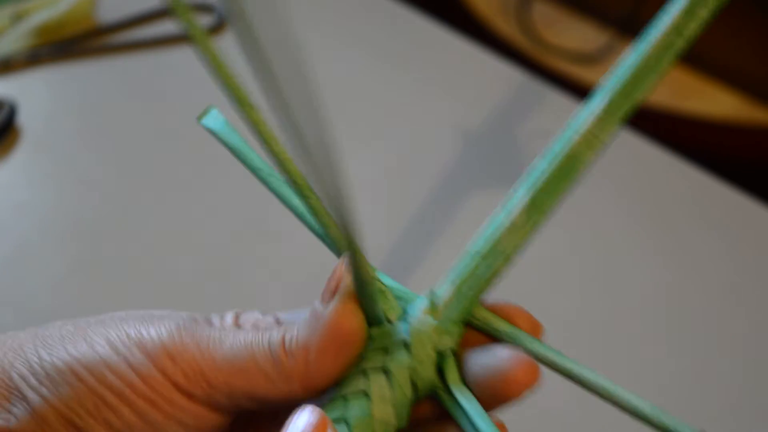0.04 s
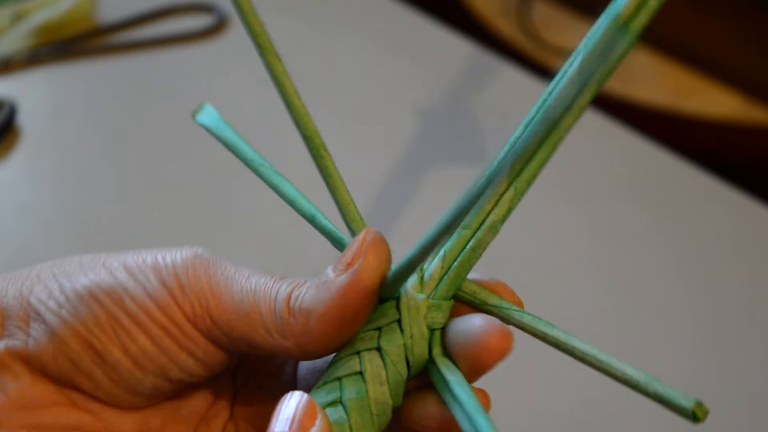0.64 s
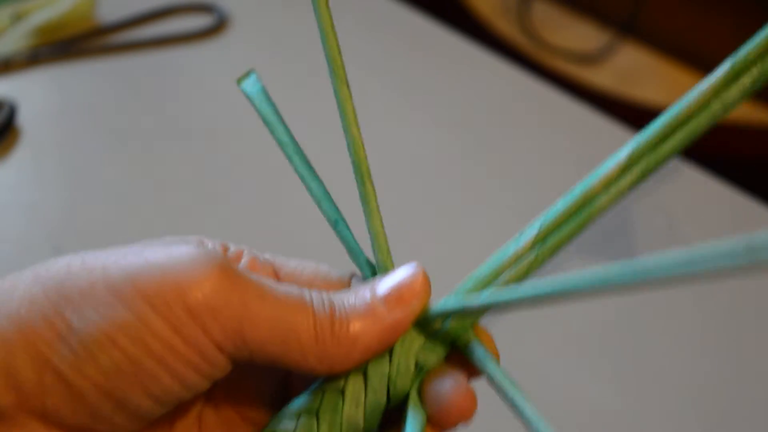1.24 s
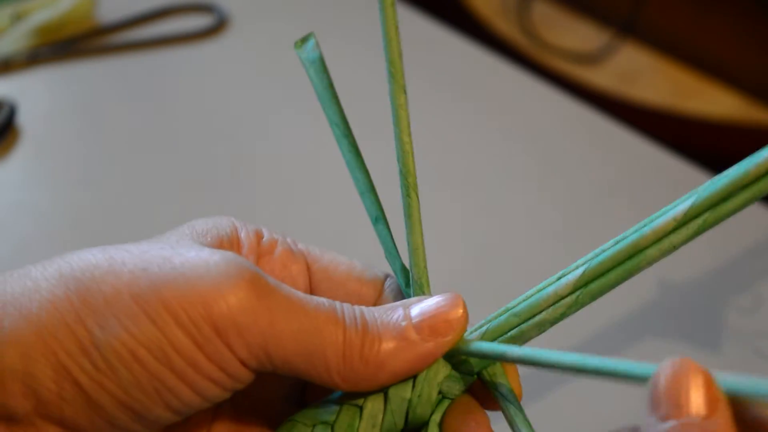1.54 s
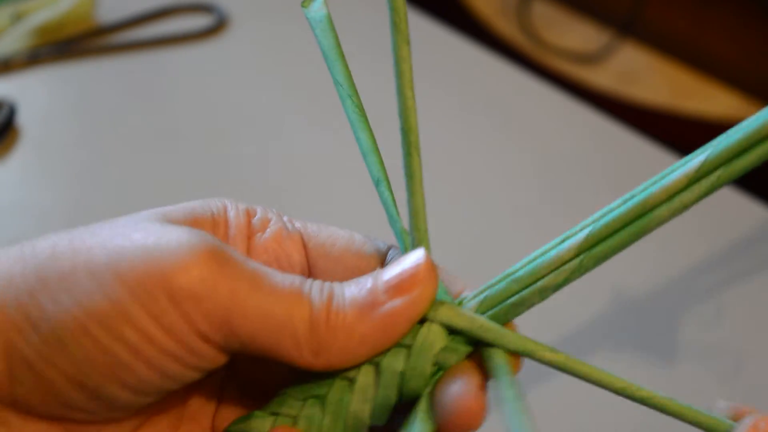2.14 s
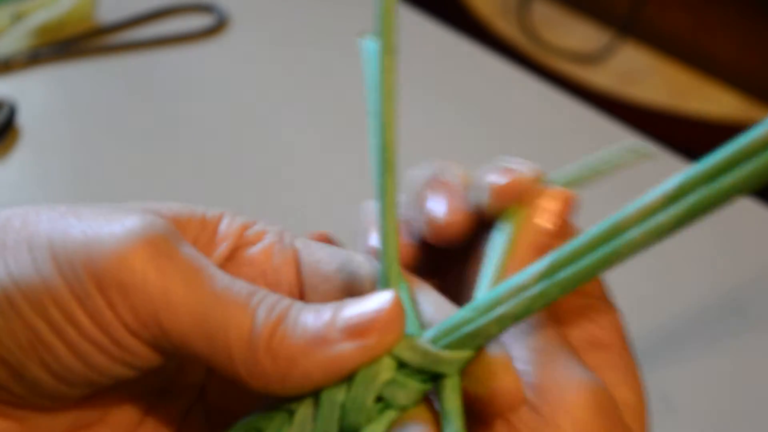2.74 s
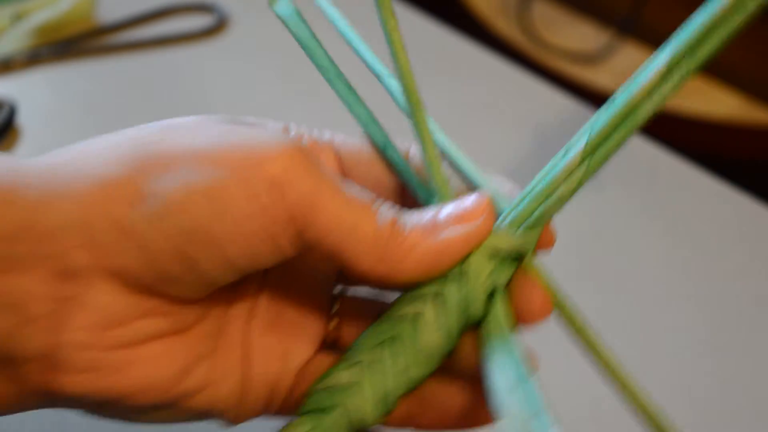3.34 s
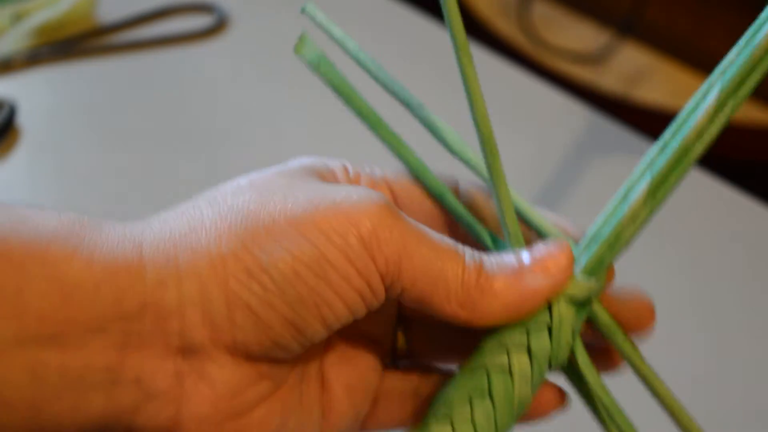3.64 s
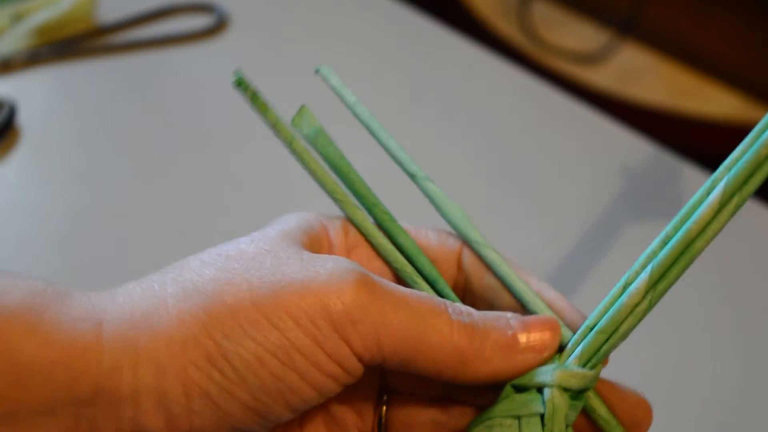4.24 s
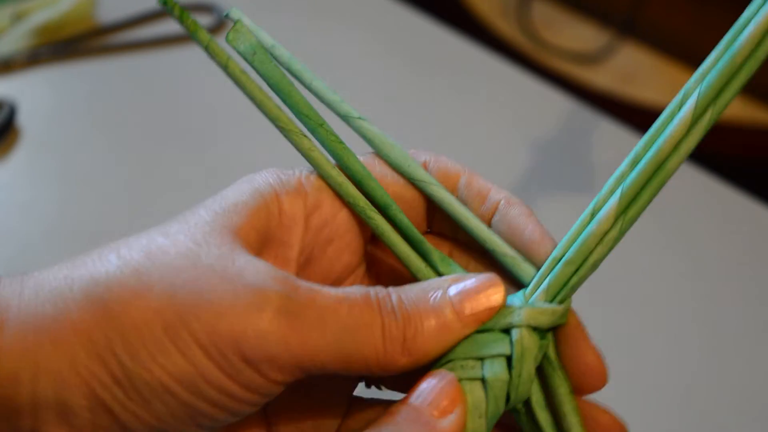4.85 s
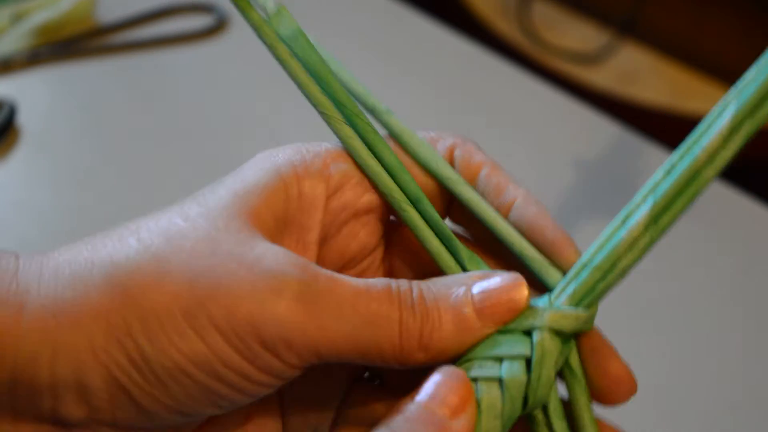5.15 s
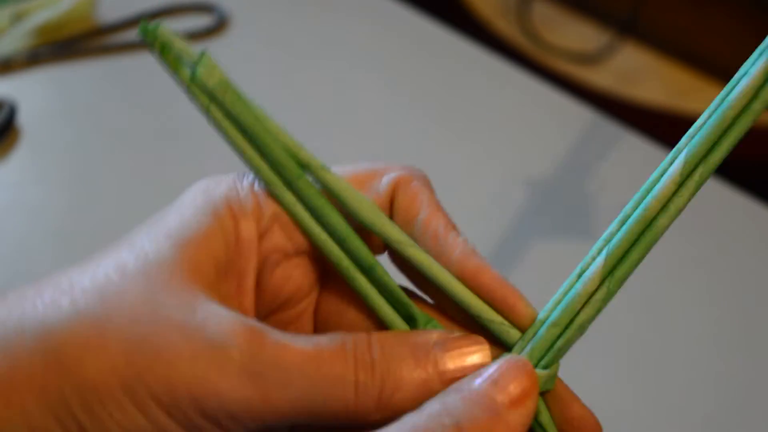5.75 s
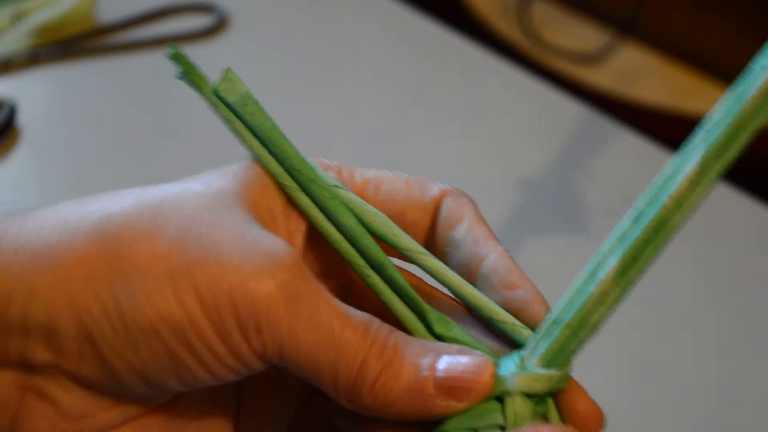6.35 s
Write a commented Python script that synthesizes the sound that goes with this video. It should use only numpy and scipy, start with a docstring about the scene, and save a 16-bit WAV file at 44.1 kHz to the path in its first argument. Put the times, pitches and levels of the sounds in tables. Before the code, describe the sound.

Soft, papery swishes and small sharp snaps come from paper tubes being braided by hand, over a faint room hiss.

```python
"""Braiding paper tubes

Hands braid rolled paper tubes above a table in a quiet room, close to a mono microphone.
The tubes hiss as they slide in tiny slips, squeak where they bind, snap where they crease, knock once.
Fingertips rub, the palm shuffles, loose ends rustle. Behind: a faint clock, a fan, mains hum and hiss."""
import sys
import numpy as np
from scipy import signal
from scipy.fft import rfft, irfft
from scipy.io import wavfile
from scipy.ndimage import uniform_filter1d

SR = 44100
rng = np.random.default_rng(int(sys.argv[2]) if len(sys.argv) > 2 else 0)


def master(y):
    """Save y as 16-bit WAV."""
    cut = np.clip(np.atleast_2d(y).T, -1, 1)
    pcm = np.round(cut * 32767)  # scale
    wavfile.write(sys.argv[1], SR, pcm.astype(np.int16))


N = 282240

# paper-on-paper friction spectrum: freq_hz, gain_db
PAPER_SPECTRUM = [(300, -14.5), (1500, -20.5), (2800, -12), (4500, -3.5), (6300, 0), (7400, -1), (9600, 4),
                  (11300, -3), (12200, -4.5), (14000, -18), (16000, -18)]
# spectrum of a cracking crease: freq_hz, gain_db
CREASE_SPECTRUM = [(300, -23), (1400, -5), (2300, -3.5), (3300, 4), (4400, -4.5), (5400, -1), (6900, -0.5),
                   (8500, 6), (11200, 2.5), (12400, -9), (16000, -8)]


def amp(db):
    """dB to amplitude."""
    return 10 ** (np.asarray(db) / 20)


def unit_rms(x):
    """Scales to rms 1."""
    return x / np.sqrt(np.mean(x ** 2) + 1e-20)


def curve(points, hz):
    """Interpolates a table on a log-frequency axis."""
    freq_hz, value = np.transpose(points)
    return np.interp(np.log(hz + 1), np.log(freq_hz + 1), value)


def add(mix, start_s, sound):
    """Adds a sound to the mix in place."""
    part = mix[max(round(start_s * SR), 0):][:len(sound)]
    part += sound[:len(part)]


def colour(x, gain):
    """Filters x by gain(hz), then scales to rms 1."""
    return unit_rms(irfft(rfft(x) * gain(np.fft.rfftfreq(len(x), 1 / SR)), len(x)))


def noise(gain):
    """Gaussian noise shaped by gain(hz), rms 1."""
    return colour(rng.standard_normal(N), gain)


def peak(hz, centre_hz, half_width_hz):
    """Gain of a resonance with steep skirts."""
    return 1 / (1 + ((hz - centre_hz) / half_width_hz) ** 2)


def comb(hz, spacing_hz):
    """Evenly spaced resonances of a pinched tube: +1 on them, -1 between."""
    return np.cos(2 * np.pi * hz / spacing_hz)


def click(gain_db, size=1024):
    """Minimum-phase click with spectrum gain_db(hz)."""
    log_gain = np.log(amp(gain_db(abs(np.fft.fftfreq(size, 1 / SR)))))
    return np.fft.ifft(np.exp(np.conj(signal.hilbert(log_gain)))).real


def slips(per_s, spread_db):
    """Fibres catch and let go: random tiny impulses, a few of them larger, rms 1."""
    size = amp(spread_db * np.minimum(rng.exponential(1, N), 4))
    sign = rng.choice([-1., 1.], N)
    return unit_rms(size * sign * (rng.random(N) < per_s / SR))


def swells(rows):
    """Envelope with one Gaussian bump per row: centre_s, length_s, level_db."""
    t = np.arange(N) / SR
    return sum(amp(db) * np.exp(-2 * ((t - centre_s) / length_s) ** 2) for centre_s, length_s, db in rows)


def air(level_db=-55.58):
    """Steady room air and microphone hiss."""
    # noise floor: freq_hz, gain_db
    spectrum = [(12, -38), (20, -7.5), (140, -2), (614, -5.5), (686, -4.5), (746, -5.5), (857, -3),
                (1410, -8), (1720, -8), (7310, -17), (15500, -20)]
    return amp(level_db) * noise(lambda hz: amp(curve(spectrum, hz)))


def fan():
    """Noise rings the narrow resonances of a fan housing."""
    # housing modes: centre_hz, half_width_hz, rms_db
    modes = [(812, 15, -76.5), (846.4, 28, -70), (990, 42, -71.5)]
    return sum(amp(db) * noise(lambda hz: peak(hz, centre_hz, half_width_hz))
               for centre_hz, half_width_hz, db in modes)


def mains_hum():
    """The mains tone and its octave."""
    # hum partials: freq_hz, rms_db
    partials = [(60, -74.5), (120, -74.5)]
    t = np.arange(N) / SR
    return sum(amp(db) * np.sqrt(2) * np.sin(2 * np.pi * (hz * t + rng.random())) for hz, db in partials)


def clock(level_db=-58, rise_s=0.0048, t60_s=0.2):
    """A double tick each second, smeared by reverberation on its way across the room."""
    # escapement beats within each second: offset_s, gain_db
    beats = [(0.041, 6.5), (0.073, 7)]
    # case modes: centre_hz, half_width_hz, gain_db
    modes = [(1730, 530, 1), (2500, 410, 3), (3750, 220, -3), (5200, 760, 0)]
    t = np.arange(N) / SR
    case = noise(lambda hz: sum(amp(db) * peak(hz, centre_hz, half_width_hz)
                                for centre_hz, half_width_hz, db in modes))
    power = np.zeros(N)
    for offset_s, db in beats:
        age_s = (t - offset_s) % 1
        power += (amp(db - 60 * age_s / t60_s) * (1 - np.exp(-age_s / rise_s))) ** 2
    return amp(level_db) * case * np.sqrt(power)


def rustle(flutter_db=4.0, ticks_per_s=45, ticks_db=-8):
    """Loose ends never quite rest: an uneven whisper with tiny creases ticking in it."""
    # rustle envelope: time_s, gain_db
    contour = [(0, -76.5), (.85, -67), (1.25, -70.5), (2.2, -72), (2.9, -60.5), (3.65, -72), (4.6, -69),
               (4.85, -67.5), (5.35, -60), (5.6, -69), (5.88, -63), (6.4, -72.5)]
    flutter = noise(lambda hz: peak(hz, 0, half_width_hz=20))
    whisper = colour(slips(per_s=7100, spread_db=3.0), lambda hz: amp(curve(PAPER_SPECTRUM, hz)))
    tick = click(lambda hz: curve(CREASE_SPECTRUM, hz))
    ticks = unit_rms(signal.oaconvolve(slips(ticks_per_s, spread_db=2.0), tick)[:N])
    gain_db = np.interp(np.arange(N) / SR, *np.transpose(contour))
    return amp(gain_db) * (whisper * amp(flutter_db * flutter) + amp(ticks_db) * ticks)


def palm_shuffles(centre_hz=225, half_width_hz=70):
    """The soft palm pushes the whole braid: a low, muffled shuffle."""
    # grip shifts: centre_s, length_s, level_db
    shifts = [(2.6, 0.6, -72), (3.27, 0.35, -67), (4.45, 0.45, -74)]
    shuffle = colour(slips(per_s=400, spread_db=0), lambda hz: peak(hz, centre_hz, half_width_hz))
    return swells(shifts) * shuffle


def finger_rubs():
    """A fingertip drags along a tube and sounds its body: dull slips that swell and die."""
    # fingertip drags: centre_s, length_s, level_db
    drags = [(1.483, 0.12, -62), (1.782, 0.032, -59), (2.165, 0.047, -53), (2.52, 0.42, -63),
             (2.93, 0.05, -59), (3.077, 0.11, -62), (3.903, 0.029, -57.5)]
    # skin-on-paper friction spectrum: freq_hz, gain_db
    skin = [(300, -22), (900, 5.5), (1300, 1), (2000, 0), (2600, -20), (3600, -3.5), (5500, -13),
            (12000, -23)]
    return swells(drags) * colour(slips(per_s=5000, spread_db=0.9), lambda hz: amp(curve(skin, hz)))


def tube_knock(rise_s=0.00029):
    """One tube strikes another and rings its damped modes."""
    # blows: start_s, peak_db
    blows = [(2.5429, -30)]
    # hollow tube modes: freq_hz, gain_db, t60_s
    modes = [(905, -20, 0.015), (1110, 1, 0.015), (1950, -15, 0.007), (3380, 5.5, 0.0051),
             (3700, 0, 0.0048), (4250, -14, .006)]
    out, t = np.zeros(N), np.arange(2048) / SR
    ring = sum(amp(db - 60 * t / t60_s) * np.sin(2 * np.pi * hz * t) for hz, db, t60_s in modes)
    ring *= 1 - np.exp(-t / rise_s)
    for start_s, peak_db in blows:
        add(out, start_s, amp(peak_db) * ring / abs(ring).max())
    return out


def tube_squeaks(half_width_hz=300, octave_db=-3):
    """Stick-slip drives the first two resonances of a pinched tube into a short, hoarse note."""
    # tubes binding in the braid: centre_s, length_s, level_db, pitch_hz
    binds = [(1.48, 0.037, -57, 3600), (2.928, 0.02, -50, 4680), (3.912, 0.034, -53.5, 3100)]
    out = np.zeros(N)
    friction = slips(per_s=4900, spread_db=3.5)
    for centre_s, length_s, level_db, pitch_hz in binds:
        note = colour(friction, lambda hz: peak(hz, pitch_hz, half_width_hz)
                      + amp(octave_db) * peak(hz, 2 * pitch_hz, half_width_hz))
        out += swells([(centre_s, length_s, level_db)]) * note
    return out


def crease_snaps(ring_db=3, max_fall_db=16, crumble_db=-16, crumble_s=0.00088, strain_s=0.00055):
    """The paper wall strains, buckles in one crack and crumbles for a millisecond more."""
    # buckles: time_s, rms_2ms_db, centre_hz, fall_db (one octave off centre), resonance_spacing_hz
    buckles = [(0.8799, -40, 10200, 5, 4220), (1.461, -32.5, 10300, 26, 3600),
               (1.4662, -35.5, 8600, 6, 3700), (1.473, -38, 10600, 5, 3600), (1.5149, -33, 10200, 2, 3300),
               (1.5185, -31.5, 10600, 4, 3300), (1.5292, -36.5, 7000, -5, 3400),
               (1.5315, -22, 8700, 13, 5000), (1.7016, -26.5, 6600, 4, 4160),
               (3.0007, -38, 12900, 29, 4200), (3.2147, -37, 5900, 13, 3950), (3.6122, -43, 9800, 28, 3300),
               (4.6844, -43.5, 5060, 31, 2860), (4.7346, -46, 9500, 2, 2710),
               (4.7616, -35.5, 3220, 1.5, 4380), (5.163, -46.5, 3000, 5, 2170),
               (6.3445, -43, 5160, 20, 2530)]
    out, lead_samples = np.zeros(N), 128
    t = (np.arange(512) - lead_samples) / SR
    crumble = amp(crumble_db) * np.exp(-np.maximum(t / crumble_s, -t / strain_s))
    for time_s, level_db, centre_hz, fall_db, spacing_hz in buckles:
        force = crumble * rng.choice([-1., 1.], len(t))
        force[lead_samples] = 1  # the wall gives way
        body = click(lambda hz: curve(CREASE_SPECTRUM, hz) + ring_db * comb(hz, spacing_hz)
                     - np.clip(fall_db * np.log2((hz + 1) / centre_hz) ** 2, 0, max_fall_db))
        crack = np.convolve(force, body)
        rms_2ms = np.sqrt(np.sum(crack ** 2) / (0.002 * SR))
        add(out, time_s - lead_samples / SR, amp(level_db) * crack / rms_2ms)
    return out


def stroke_envelope(t, length_s, rise_share=0.51, fall_share=0.46,
                    brush_db=-12.5, lead_s=0.057, trail_s=0.026):
    """A stroke gathers speed, holds and stops; the tubes brush lightly before and after."""
    rise = t / (rise_share * length_s)
    fall = (length_s - t) / (fall_share * length_s)
    ramp = np.clip(np.minimum(rise, fall) + 0.5, 0, 1)
    brush = np.exp(np.minimum(t, 0) / lead_s - np.maximum(t - length_s, 0) / trail_s)
    return np.hypot(np.sin(np.pi / 2 * ramp) ** 2, amp(brush_db) * brush)


def tube_slides(trim_db=-1.6, judder_db=1.77, ring_db=2.8, pivot_hz=7500,
                mid_spacing_hz=2960, grip_octaves=0.36):
    """Tube slides over tube: a stream of slips coloured by the paper and the tube's resonances."""
    # sliding strokes: start_s, length_s, gain_db, tilt_db_per_octave
    strokes = [(0, 0.021, -41, -2.5), (0.022, 0.088, -62, 0), (.887, 0.025, -52.5, 6),
               (0.978, 0.13, -47.5, 2), (1.424, 0.17, -53, -3), (1.506, 0.011, -45, 3),
               (1.705, 0.073, -53.5, -3), (1.776, 0.019, -45, -2.5), (2.06, .04, -58.5, -6),
               (2.123, 0.064, -57, -7), (2.592, 0.029, -53, -4), (2.84, .05, -51, -3.5),
               (2.92, 0.014, -51, -8), (2.994, 0.071, -49, -8.5), (3.097, 0.044, -53.5, 3),
               (3.175, 0.017, -50, -7), (3.27, 0.075, -46.5, 0.5), (3.391, .05, -46, -2),
               (3.538, 0.027, -43, 0), (3.57, 0.1, -54.5, -3.5), (3.767, 0.071, -53, -1),
               (3.874, 0.057, -49, -1), (4.079, 0.17, -47, .5), (4.323, 0.075, -49.5, -2),
               (4.442, 0.054, -53.5, -6), (4.736, 0.065, -54.5, -7), (5.13, 0.098, -58.5, -7),
               (5.231, 0.087, -41, 3.5), (5.428, 0.054, -43.5, 0), (5.716, 0.03, -49.5, -6),
               (5.904, 0.018, -39, 0.5), (5.955, 0.081, -50.5, -4), (6.111, 0.097, -53, -2)]
    out, margin_s = np.zeros(N), 0.15
    judder = unit_rms(uniform_filter1d(rng.standard_normal(N), size=260))
    friction = slips(per_s=11000, spread_db=1.0) * amp(judder_db * judder)
    # the free length of tube sets the resonance spacing and changes with each grip
    spacings_hz = mid_spacing_hz * 2 ** (grip_octaves * rng.uniform(-1, 1, len(strokes)))
    for (start_s, length_s, gain_db, tilt_db_per_octave), spacing_hz in zip(strokes, spacings_hz):
        first_s = max(start_s - margin_s, 0)
        stroke = friction[round(first_s * SR):round((start_s + length_s + margin_s) * SR)]
        t = first_s - start_s + np.arange(len(stroke)) / SR
        hiss = colour(stroke, lambda hz: amp(
            curve(PAPER_SPECTRUM, hz) + ring_db * comb(hz, spacing_hz)
            + tilt_db_per_octave * np.log2(np.clip(hz, 3500, 11000) / pivot_hz)))
        add(out, first_s, amp(gain_db + trim_db) * hiss * stroke_envelope(t, length_s))
    return out


def room(x, tail_db=-13, tail_rise_s=0.0024, near_db=-13, near_delay_s=0.002, near_t60_s=0.062):
    """Adds quick scatter from the table and nearby things, and a soft tail whose treble dies first."""
    # room decay: freq_hz, t60_s
    decay = [(500, 0.54), (3000, 0.14), (9000, 0.17), (15000, 0.13)]
    hz, frame_s, spectra = signal.stft(rng.standard_normal(SR // 2), SR, nperseg=256)
    spectra *= amp(-60 * frame_s / curve(decay, hz)[:, None])
    tail = signal.istft(spectra, SR, nperseg=256)[1]
    t = np.arange(len(tail)) / SR
    tail *= np.minimum(t / tail_rise_s, 1)
    near = rng.standard_normal(len(t)) * amp(-60 * t / near_t60_s) * (t > near_delay_s)
    response = amp(tail_db) * tail / np.linalg.norm(tail) + amp(near_db) * near / np.linalg.norm(near)
    return x + signal.fftconvolve(x, response)[:N]


def scene():
    """The handwork in its room, the same on both channels."""
    hands = tube_slides() + rustle() + tube_squeaks() + crease_snaps()
    hands += finger_rubs() + palm_shuffles() + tube_knock()
    mono = room(hands) + clock() + air() + fan() + mains_hum()
    return np.array([mono, mono])


def record(dry, low_cut_hz=36, high_cut_hz=15850):
    """The microphone's low cut and the recorder's band limit."""
    highpass = signal.butter(2, low_cut_hz, "highpass", fs=SR, output="sos")
    lowpass = signal.firwin(511, high_cut_hz, window=("kaiser", 9), fs=SR)
    return signal.oaconvolve(signal.sosfilt(highpass, dry), lowpass[None], "same")


dry = scene()
out = record(dry)
master(out)
```